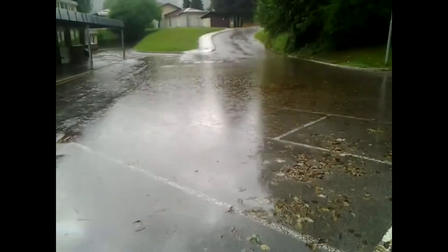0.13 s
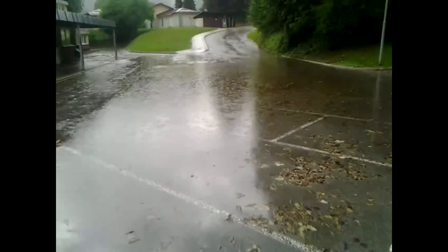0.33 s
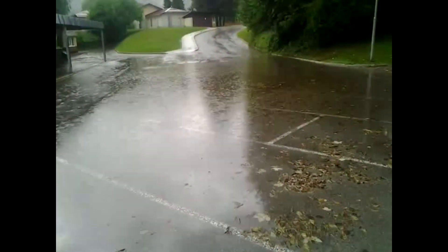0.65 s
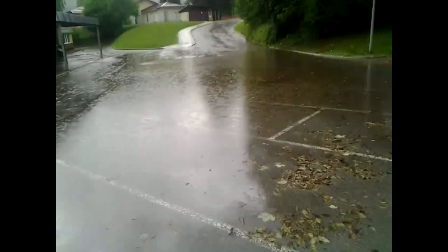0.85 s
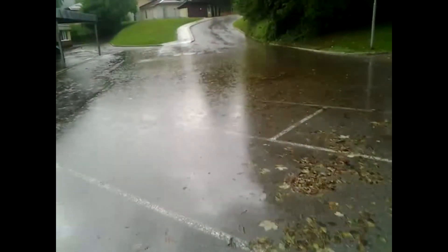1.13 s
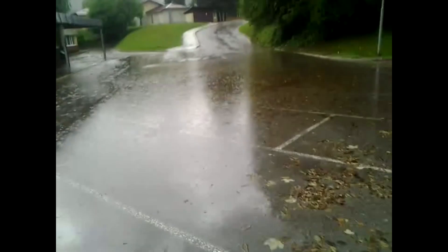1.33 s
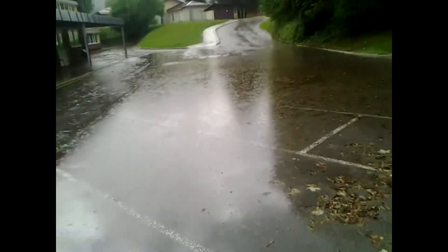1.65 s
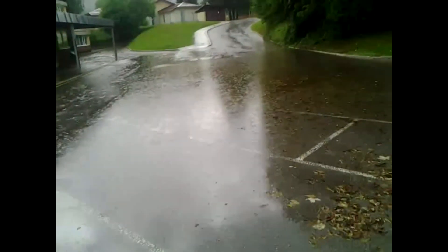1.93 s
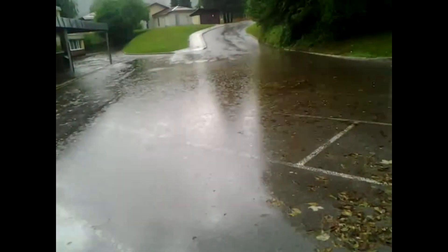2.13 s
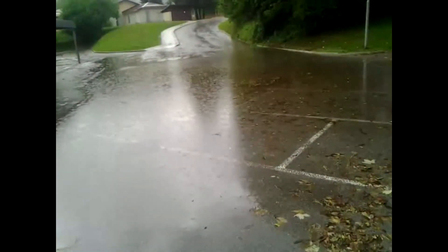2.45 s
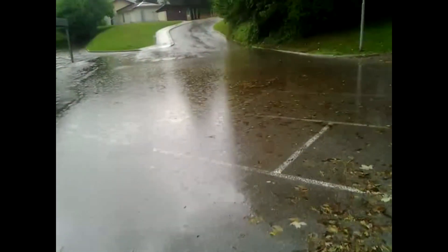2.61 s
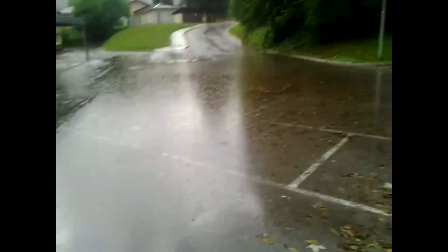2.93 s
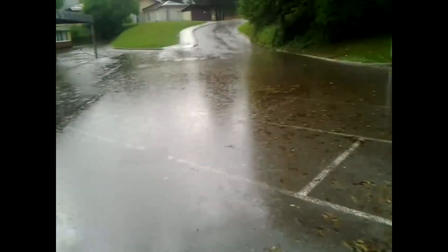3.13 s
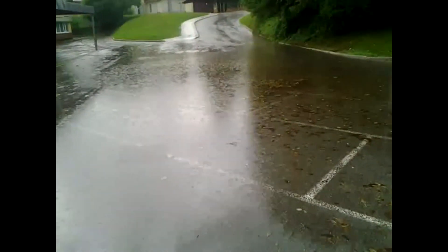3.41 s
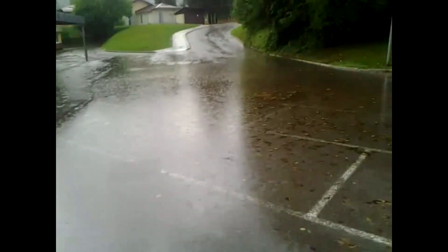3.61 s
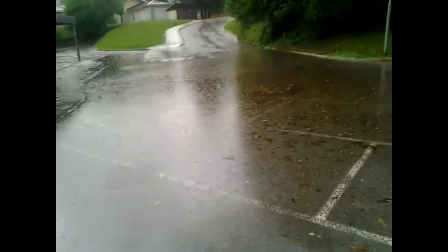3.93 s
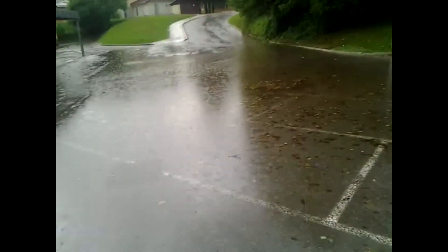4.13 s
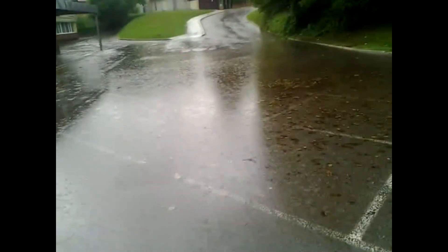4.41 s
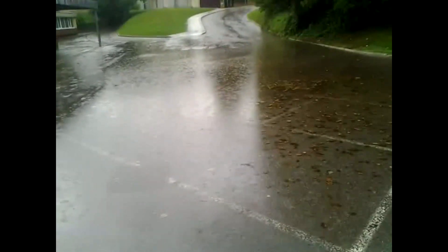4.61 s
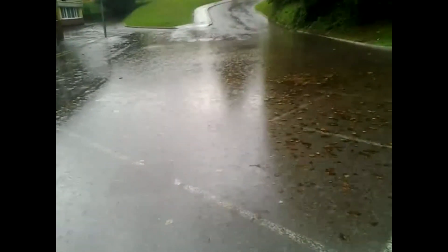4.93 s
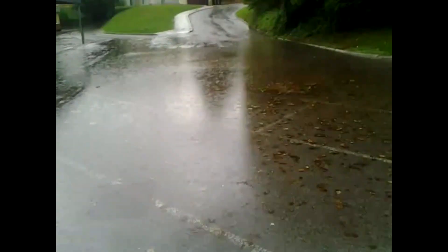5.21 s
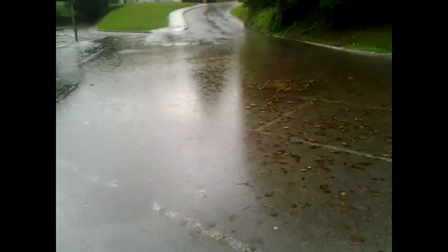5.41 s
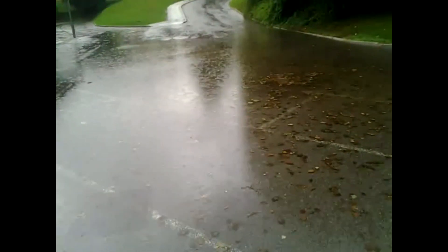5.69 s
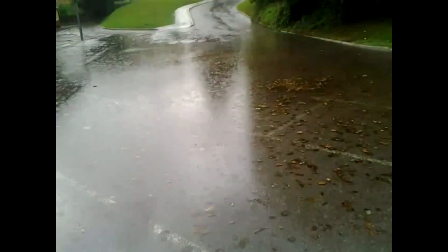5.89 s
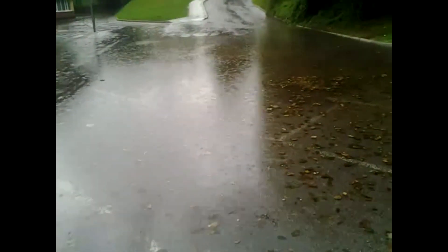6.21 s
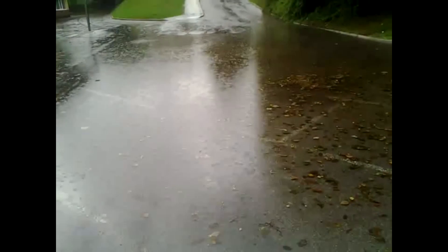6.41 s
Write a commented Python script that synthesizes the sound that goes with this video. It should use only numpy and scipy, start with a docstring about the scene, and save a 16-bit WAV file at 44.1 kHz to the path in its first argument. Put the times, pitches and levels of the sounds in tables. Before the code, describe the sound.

Close, dry pops of large drops on an umbrella come thickly at first, over random light patter and a muted wash from rain on open water. Low gusts flutter against the small recorder, peaking in hard bumps and a clipped thud before three seconds. Afterwards it is calmer, with sparser drops, a far wavering roar, and another moderate gust near six seconds.

```python
"""Rain on an umbrella

Steady rain over a flooded parking lot, heard from under what is likely an umbrella.
Drops tick on the taut cloth close overhead: each is a short blow coloured by the cloth.
Shaped noise makes the wash of rain on standing water and a faint, hollow roar that swells far off.
Gusts rumble at the microphone of a small, narrow-band recorder, with single hard buffets on top."""
import sys
import numpy as np
from scipy import signal
from scipy.fft import rfft, irfft
from scipy.io import wavfile
from scipy.ndimage import uniform_filter1d

SR = 44100
rng = np.random.default_rng(int(sys.argv[2]) if len(sys.argv) > 2 else 0)


def output_pcm(signal):
    """Save a mono or channel-first signal as 16-bit PCM at the path in sys.argv[1].

    Samples are clipped to [-1, 1] before scaling.
    """
    pcm = np.clip(np.atleast_2d(signal).T, -1, 1) * 32767
    wavfile.write(sys.argv[1], SR, np.round(pcm).astype(np.int16))


N = 288855
TIME = np.arange(N) / SR
RECORDER_HZ = 16000  # sampling rate of the small recorder
EDGE_HZ = 14500  # upper band limit of the finished sound


def gain_of(db):
    """Turns decibels into amplitude."""
    return 10 ** (np.asarray(db) / 20)


def evened(x):
    """Scales a sound to an rms (average strength) of 1."""
    return x / np.sqrt(np.mean(x ** 2) + 1e-20)


def read(points, hz):
    """Reads a colour table, joining its points on a log-frequency axis."""
    f, value = np.transpose(points)
    return np.interp(np.log(hz + 1), np.log(f + 1), value)


def follow(curve, t=TIME):
    """Reads a level table, joining its points with straight lines in time."""
    return np.interp(t, *np.transpose(curve))


def add(mix, s, sound):
    """Mixes a sound in, starting at time s."""
    part = mix[max(round(s * SR), 0):][:len(sound)]
    part += sound[:len(part)]


def coloured(x, points):
    """Filters a full-length sound by a colour table."""
    return irfft(rfft(x) * gain_of(read(points, np.fft.rfftfreq(N, 1 / SR))), N)


def noise(field, size=1024):
    """Makes noise of rms 1 whose short-time spectrum in dB is field(seconds, Hz)."""
    hop = size // 4
    t = np.arange(N // hop + 5)[:, None] * hop / SR
    hz = np.fft.rfftfreq(size, 1 / SR)[None]
    a, b = rng.standard_normal((2, t.size, hz.size))
    z = (a + 1j * b) * gain_of(field(t, hz))
    sound = signal.istft(z.T, nperseg=size, noverlap=size - hop)[1]
    return evened(sound[:N])


# colour of one tick on the cloth, before its own variations: [f/Hz, level/dB]
CLOTH_COLOUR = [(60, -53), (200, -4), (400, -5.5), (900, -4), (1500, -2.5), (2050, 0), (2500, 0.5),
                (3150, -8.5), (4300, -5), (5500, -9.5), (6200, -17.5), (6800, -30), (7600, -48.5),
                (9000, -73.5)]


def tick(bright_db, spatter_db, size=2048):
    """One drop of peak 1: a sharp blow, a ringing panel, flung droplets and a rustling canopy."""
    t = np.arange(size) / SR
    ring_s, spatter_s, rustle_s = 0.00059, 0.0039, 0.0092  # decay times
    rustle_db, droplets_per_s, ripple_db = -35, 4000, 2.5

    panel_hz = 1700 * np.exp(0.5 * rng.standard_normal())
    blow = gain_of(-13.5) / 2 * np.exp(-t / ring_s) * np.cos(2 * np.pi * panel_hz * t)
    droplets = evened(rng.standard_normal(size) * (rng.random(size) < droplets_per_s / SR))
    blow += 0.33 * gain_of(spatter_db) * np.exp(-t / spatter_s) * droplets
    blow += gain_of(rustle_db) * np.exp(-t / rustle_s) * rng.standard_normal(size)
    blow[0] += 1  # the sharp blow itself

    hz = abs(np.fft.fftfreq(size, 1 / SR))
    # a shorter contact lifts the treble and lowers what lies below 2900 Hz
    tilt_db = 0.86 * bright_db * np.tanh(2 * np.log((hz + 1) / 2900))
    # every spot of the cloth has its own humps and dips
    bumps_hz = np.linspace(0, RECORDER_HZ / 2, 10)
    spot_db = ripple_db * np.interp(hz, bumps_hz, rng.standard_normal(10))
    log_gain = np.log(gain_of(read(CLOTH_COLOUR, hz) + tilt_db + spot_db))
    # this phase makes the filter causal, so the blow comes first
    cloth_filter = np.exp(np.conj(signal.hilbert(log_gain)))
    sound = np.fft.ifft(np.fft.fft(blow) * cloth_filter).real
    return sound / abs(signal.hilbert(sound)).max()


# drops on the cloth, most of them heavy, a few light; the row at 2.3655 s is no drop but the
# broad click of the overloading buffet. Brightness sets the treble tilt and spatter the droplets,
# both scaled further in tick: [t/s, peak level/dB, brightness setting/dB, spatter setting/dB]
TIMED_TICKS = [(0.0872, -12.5, 3, -6), (.1952, -8.5, 2, -21), (0.2702, -9.5, 1, -11), (.54, -11, 1, -3),
               (.66, -8.5, -2, -10), (0.7206, -7, 7, -20), (.725, -6, -11, -22), (0.9017, -7.5, 2, -9),
               (0.9416, -8.5, -7, -13), (1.045, -11, -5, -10), (1.103, -6.5, -3, -24),
               (1.2642, -4, -1.5, -24), (1.3691, -6.5, 0, -23), (1.4864, -26, 0, -22),
               (1.5095, -12.5, 8, -26), (1.688, -10, -3, -27), (1.8467, -7, 3, -20), (1.861, -8, -2.5, -12),
               (1.957, -7.5, 1.5, -21), (1.989, -5, 4.5, -14), (2.147, -6, -1, -22), (2.253, -5.5, -2, -14),
               (2.2647, -7.5, -1, -17), (2.3655, -6.5, -5, -7), (2.4443, -20, 7, -24),
               (2.5026, -9.5, -1, -18), (2.5717, -5, -3, -18), (2.6067, -8.5, -6, -5), (2.7227, -12, 0, -4),
               (2.8126, -9, 1, -25), (2.8591, -6.5, 2, -10), (3.3184, -11, -2, -23), (3.3673, -9, 0, -16),
               (3.395, -14, -5, -20), (3.704, -8, 3, -19), (3.9312, -11, 5, -24), (3.9752, -7, 3, -16),
               (4.0665, -9.5, -3, -19), (4.2452, -9.5, -6, -20), (4.6604, -10, 9, -17),
               (4.7238, -12, -7, -8), (4.959, -12.5, 6, -17), (5.2513, -10.5, -3, -14),
               (6.2367, -7, -8, -12), (6.3097, -13.5, 7, -14), (6.473, -6.5, -1, -12),
               (6.4837, -8, -4, -13)]


def timed_ticks():
    """Drops that strike the cloth at set times, and one click of an overloading buffet made alike."""
    out = np.zeros(N)
    for s, peak_db, bright_db, spatter_db in TIMED_TICKS:
        add(out, s, gain_of(peak_db) * tick(bright_db, spatter_db))
    return out


# strength of the patter as the shower eases off and picks up again: [t/s, level/dB]
PATTER_LEVEL = [(0, -27.5), (1.2, -30), (1.55, -31), (2.75, -30.5), (3.35, -35), (3.95, -31.5), (4.4, -33),
                (4.9, -32), (5.5, -35), (6.4, -30), (6.55, -34.5)]


def patter(drops_per_s=340, spread_db=7, range_db=14.5, kinds=64):
    """Many small drops and fewer large ones land at random on the cloth."""
    out = np.zeros(N)
    for _ in range(kinds):
        lands = np.flatnonzero(rng.random(N) < drops_per_s / kinds / SR)
        # sizes past the range wrap round to small again
        size_db = (spread_db * rng.exponential(1, N)[lands]) % range_db
        blows = np.zeros(N)
        blows[lands] = gain_of(size_db)
        bright_db = 4 * rng.standard_normal()
        spatter_db = -14 + 4 * rng.standard_normal()
        out += signal.oaconvolve(blows, tick(bright_db, spatter_db))[:N]
    # the flow of rain is steady over a fraction of a second
    flow = np.sqrt(uniform_filter1d(out ** 2, size=10000) + 1e-12)
    return gain_of(follow(PATTER_LEVEL)) * out / flow


# colour of rain on the open water all around: [f/Hz, relative level per Hz/dB]
WASH_COLOUR = [(30, -11), (200, -1), (480, -3.5), (650, -3), (1100, -4), (1450, 1), (2450, 0.5), (3200, -7),
               (4300, -6), (5450, -7.5), (6100, -15), (6800, -26), (7600, -45), (9000, -74)]


def wash(level_db=-35.5, patchy_db=1.5):
    """Countless far drops on the water merge into a hiss with drifting patches."""
    def field(t, hz):
        specks = rng.standard_normal((t.size, hz.size))
        patches = uniform_filter1d(uniform_filter1d(specks, size=10, axis=0), size=14, axis=1)
        return read(WASH_COLOUR, hz) + patchy_db * evened(patches)
    return gain_of(level_db) * noise(field)


# the light breeze on the microphone between gusts: [t/s, level/dB]
BREEZE_LEVEL = [(0, -27), (.35, -41.5), (.8, -25.5), (1.3, -29), (1.9, -24.5), (2.6, -25.5), (2.92, -33.5),
                (3.3, -32), (4.2, -38), (4.85, -41), (5.5, -37), (5.75, -28), (6.55, -31.5)]
# gusts on top of the breeze: [t/s at the crest, crest level/dB, length/s]
GUST_CRESTS = [(0.098, -27.5, 0.033), (0.516, -26, 0.087), (0.663, -20.5, 0.047), (0.92, -21.5, 0.099),
               (1.052, -19, 0.15), (1.393, -24.5, .05), (1.594, -17, .2), (1.761, -20.5, 0.031),
               (2.1, -12.5, 0.18), (2.343, -13, 0.2), (2.528, -14.5, 0.13), (2.728, -19.5, 0.16),
               (3.043, -29.5, 0.12), (3.51, -25.5, 0.061), (3.86, -28, .06), (4.007, -30.5, 0.09),
               (4.4, -31, 0.11), (5.34, -33, .11), (6.028, -19.5, 0.16), (6.293, -24, 0.13)]


def wind_db(t, rise=0.45, edge_db=7):
    """Wind strength: the breeze plus gusts that die away a little more slowly than they rise."""
    power = gain_of(follow(BREEZE_LEVEL, t)) ** 2
    for s, crest_db, length in GUST_CRESTS:
        # rise is the share of the length before the crest; away is 1 at both ends of the gust
        away = (t - s) / (length * np.where(t < s, rise, 1 - rise))
        # at both ends the gust is edge_db below its crest
        power = power + gain_of(crest_db - edge_db * np.minimum(away ** 2, 100)) ** 2
    return 10 * np.log10(power)


# colour of the wind at a strength of -21 dB: [f/Hz, relative level per Hz/dB]
EDDY_COLOUR = [(8, -6), (25, -22.5), (55, 3), (95, 0), (150, -2), (220, -12.5), (320, -20), (500, -37.5),
               (900, -46), (2500, -94)]
# the microphone port booms a little in the wind: [f/Hz, level/dB]
PORT_COLOUR = [(30, 0.5), (70, 1.5), (92, -0.5), (120, -0.5), (200, -1.5)]


def wind(octave_db=24, flutter_db=3, puff_db=1.0, calm_db=-11):
    """Eddies at the port: a stronger gust sheds faster eddies, so the rumble rises in pitch."""
    def field(t, hz):
        # octave_db more wind doubles the pitch; below calm_db the pitch falls no further
        speed = 2 ** (np.maximum(wind_db(t) + 21, calm_db) / octave_db)
        return read(EDDY_COLOUR, hz / speed)

    # both inline tables: (f/Hz, level/dB)
    flutter_colour = [(3, -29), (12, -6.0), (35, -12), (90, -63), (300, -92)]
    flutter = evened(coloured(rng.standard_normal(N), flutter_colour))
    rumble = coloured(noise(field) * gain_of(flutter_db * flutter), PORT_COLOUR)
    # level the rumble over about a tenth of a second, so that wind_db sets its strength
    power = uniform_filter1d(uniform_filter1d(rumble ** 2, size=4400), size=1200)
    rumble /= np.sqrt(power + 1e-9)
    # the air arrives in uneven puffs, several a second
    puff_colour = [(2, -29), (7, -2), (14, 6.5), (30, -37), (100, -92)]
    puffs = evened(coloured(rng.standard_normal(N), puff_colour))
    return gain_of(wind_db(TIME) + puff_db * puffs) * rumble


# single hard buffets; the level is that of the swing without the boom:
# [t/s at the middle, peak level/dB, swing f/Hz]
HARD_BUFFETS = [(0.643, -12, 76), (.933, -4, 189), (1.011, -15, 165), (1.783, -23, 190), (2.061, -12, 300),
                (2.089, -6, 238), (2.108, -20, 262), (2.132, -10, 300), (2.3669, 3.5, 177),
                (2.532, -5, 100), (3.364, -15.5, 171), (4.4, -22, 90), (5.936, -11, 129),
                (6.138, -12.5, 127)]


def buffets(cycles=0.41, boom_db=-10, boom_hz=98, boom_s=0.012):
    """A large eddy sucks at the port, the pressure swings back, and the port booms briefly."""
    out = np.zeros(N)
    lead_s = 1 / 20  # each sound starts this long before its middle
    t = np.arange(-SR // 20, SR // 10) / SR
    after = np.maximum(t, 0)
    boom_fade = np.exp(-after / boom_s) * np.tanh(after * 4 * boom_hz)
    boom = gain_of(boom_db) * boom_fade * np.sin(2 * np.pi * boom_hz * after)
    for s, peak_db, hz in HARD_BUFFETS:
        swing = np.exp(-(t * hz / cycles) ** 2) * np.sin(2 * np.pi * hz * t)
        add(out, s - lead_s, gain_of(peak_db) * (swing / swing.max() + boom))
    return out


# strength of the far, hollow roar: [t/s, level/dB]
ROAR_LEVEL = [(0, -42.5), (3.2, -52), (4.6, -41.5), (5.3, -38), (5.9, -36.5), (6.55, -39.5)]
# colour of the far roar: [f/Hz, relative level per Hz/dB]
ROAR_TONE = [(110, -4), (200, -1.5), (450, -1.5), (620, 5.5), (740, 3.5), (925, 11), (1120, -4.5),
             (1450, -5), (2200, -52)]


def far_roar(waver_db=1.5):
    """A faint, wavering, hollow band of noise, perhaps tyres on a wet road."""
    def field(t, hz):
        specks = rng.standard_normal((t.size, hz.size))
        drift = uniform_filter1d(uniform_filter1d(specks, size=10, axis=0), size=3, axis=1)
        return read(ROAR_TONE, hz) + waver_db * evened(drift)
    return gain_of(follow(ROAR_LEVEL)) * noise(field, size=2048)


def scene():
    """Adds up rain near and far, the wind and the distant roar."""
    rain = timed_ticks() + patter() + wash()
    return (rain + wind() + buffets() + far_roar())[None]


# leak of the mirror image above half the recorder's sampling rate: [f/Hz, level/dB]
MIRROR_LEAK = [(7000, -42), (8800, -7.5), (10200, -22), (11000, -29), (12000, -38.5), (14000, -70)]


def record(dry):
    """The low sampling rate leaves a faint mirror image; overloads clip; then the band is limited."""
    mirrored = 2 * dry[0] * np.cos(2 * np.pi * RECORDER_HZ * TIME)
    x = dry[0] + coloured(mirrored, MIRROR_LEAK)
    x = np.clip(x, -1, 1)  # the hardest buffet overloads
    band_limit = signal.firwin(511, EDGE_HZ, window=("kaiser", 9), fs=SR)
    return signal.oaconvolve(x, band_limit, "same")[None]


dry = scene()
out = record(dry)
output_pcm(out)
```